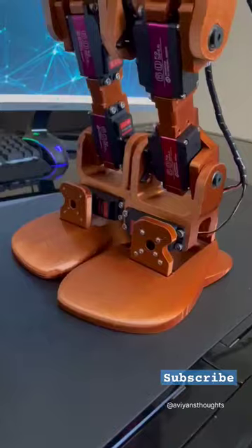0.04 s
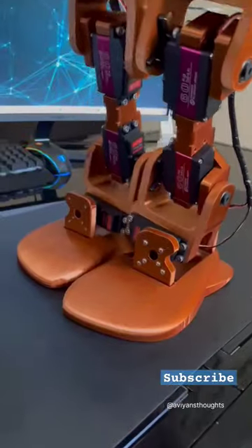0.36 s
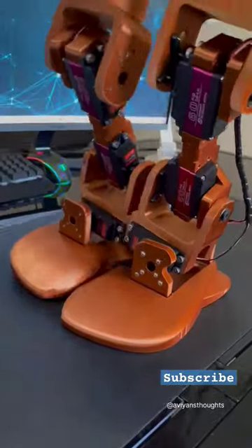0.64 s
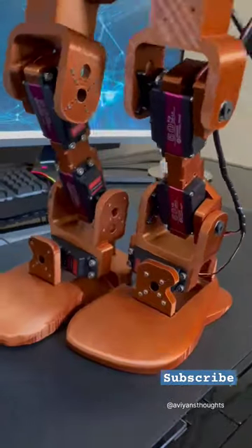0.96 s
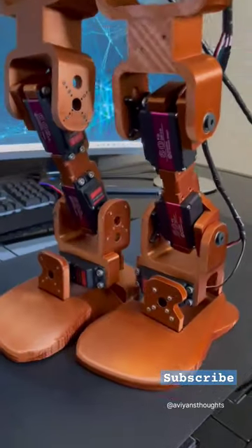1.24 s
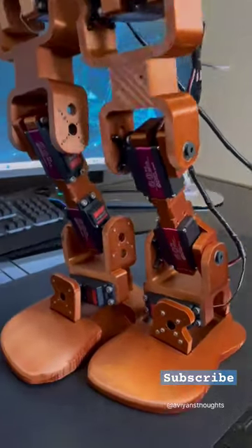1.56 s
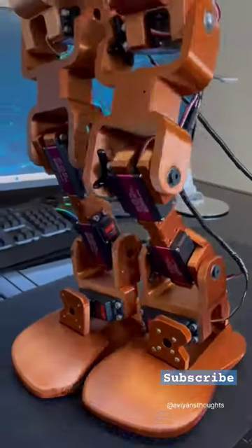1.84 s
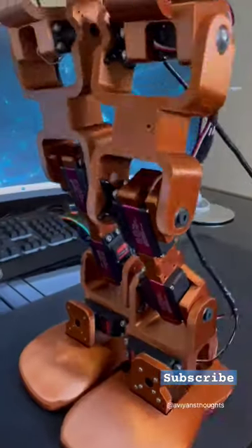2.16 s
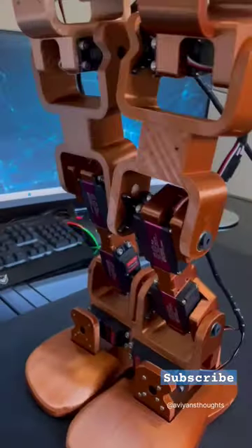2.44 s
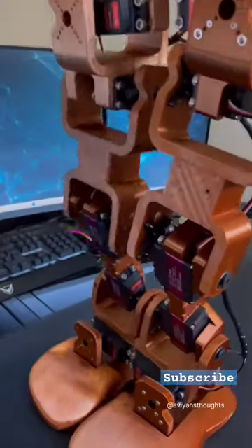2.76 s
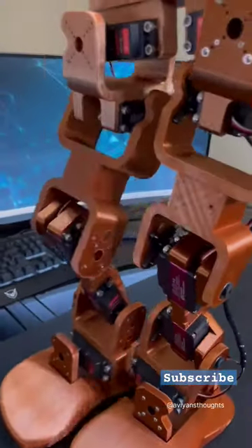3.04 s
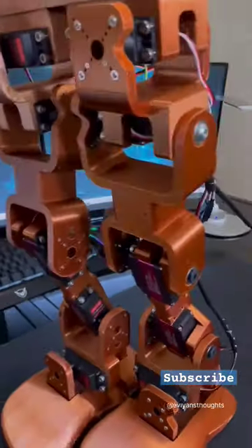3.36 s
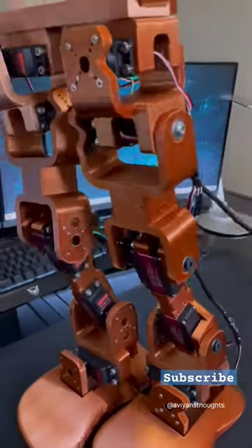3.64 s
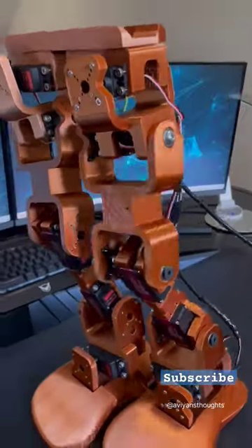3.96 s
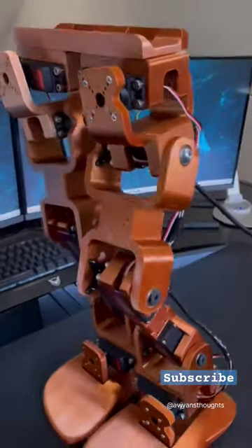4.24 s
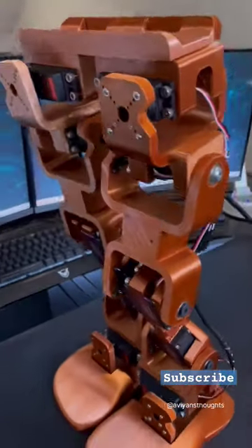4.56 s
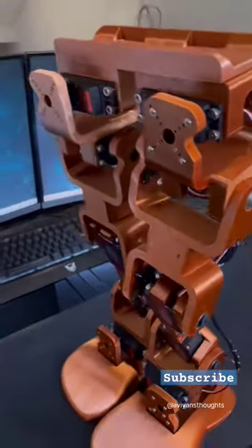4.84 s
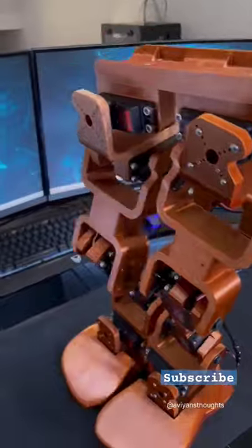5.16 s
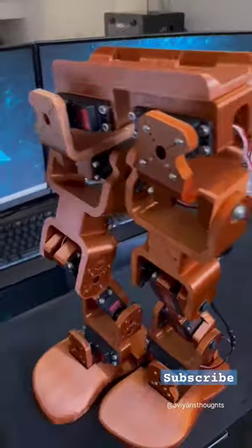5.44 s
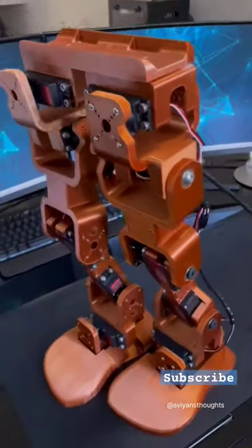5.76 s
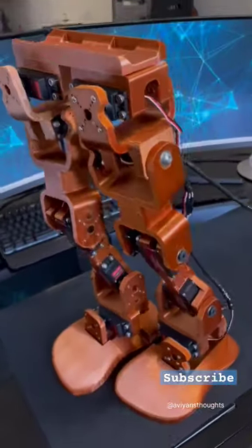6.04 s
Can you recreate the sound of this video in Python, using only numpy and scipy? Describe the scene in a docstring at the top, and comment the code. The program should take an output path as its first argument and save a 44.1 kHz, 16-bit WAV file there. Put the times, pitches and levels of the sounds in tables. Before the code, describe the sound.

A little walking robot's motors whine up and down close by, with squeaky gears and plastic feet knocking on a desk.

```python
"""Geared servos whirr up and down, close to the microphone: a small printed-plastic biped walks on a desk.
Five times a leg swings, gear teeth whining, rattling and squealing under load, slack joints ticking.
A hollow foot chatters down, the desk booms and the frame rocks; then the servos creep on to shift
the weight. Behind it are the short reflections and steady air of a small room. The microphone's two
ports hear the robot slightly out of step, while the boom sits in the middle."""
import sys
import numpy as np
from scipy import signal
from scipy.fft import rfft, irfft, next_fast_len
from scipy.io import wavfile
from scipy.ndimage import uniform_filter1d

SR = 44100
rng = np.random.default_rng(int(sys.argv[2]) if len(sys.argv) > 2 else 0)


def waveform_to_disk(signal):
    """Save audio, clipped to [-1, 1], as 16-bit WAV at the path in sys.argv[1]."""
    frames = np.transpose(np.atleast_2d(signal))
    scaled = np.clip(frames, -1, 1) * 32767
    samples = np.round(scaled).astype(np.int16)
    wavfile.write(sys.argv[1], SR, samples)


N = 269010
TIME = np.arange(N) / SR

# Leg swings. Each row: times of engaging and of top speed, then lengths of run-up and braking, in
# seconds; top tooth rates of hip and knee in Hz; whine, rattle, sizzle and frame lurch in dB.
SWINGS = [(0.443, 0.683, 0.15, 0.087, 1587, 1521, -39.5, -38, -48.5, -44),
          (1.572, 1.827, 0.12, 0.068, 1546, 1467, -44.5, -40, -52.5, -49.5),
          (2.73, 2.954, 0.15, 0.084, 1589, 1568, -39, -36.5, -49, -47.5),
          (3.802, 4.115, .185, 0.059, 1490, 1420, -48, -41.5, -53.5, -52.5),
          (5.014, 5.219, 0.16, 0.1, 1549, 1514, -39.5, -38.5, -50.5, -45)]
# Weight shifts onto the landed foot. Each row: start and length of the full push in seconds,
# tooth rate in Hz, then whine, rattle and sizzle in dB.
SHIFTS = [(0.988, 0.062, 1732, -46.5, -41.5, -56.5), (2.135, 0.055, 1721, -54, -44.5, -59.5),
          (3.258, 0.1, 1703, -53.5, -42, -58.5), (4.345, .14, 1720, -59.5, -47, -61.5),
          (5.542, 0.064, 1780, -50.5, -42.5, -56.5)]
# Small balancing moves. Each row: start and length in seconds, first and last tooth rate in Hz,
# then whine, rattle and sizzle in dB.
TRIMS = [(0.802, 0.14, 1570, 1520, -63, -56, -78), (1.201, 0.048, 1313, 1077, -64, -49.5, -50),
         (1.238, 0.29, 1698, 1747, -60, -54, -64), (1.974, 0.089, 1510, 1390, -62.5, -49, -50),
         (3.483, 0.33, 1638, 1422, -61.5, -52.5, -52.5), (3.568, 0.21, 1225, 1019, -61.5, -49, -53),
         (4.245, 0.1, 1225, 1017, -53.5, -54, -50.5), (5.325, 0.085, 1555, 1707, -61, -50, -71),
         (5.702, 0.14, 1554, 1657, -59.5, -47, -49.5), (5.865, 0.22, 1720, 1663, -61, -54.5, -66.5)]
# A slack joint snaps over, then slides. Each row: time in seconds, tick in dB, slide sizzle in dB.
TICKS = [(0.443, -49, -61), (0.53, -38, -52), (.7154, -42, -51), (0.9265, -37, -50), (2.821, -44, -53),
         (3.207, -35, -52), (4.69, -46, -55.5), (4.995, -48, -70), (5.0685, -42, -62), (5.096, -45, -43.5)]
# A sole chatters until the weight comes down. Each row: start and chatter length in seconds, chatter
# in dB, lead of the foot's main mode in dB per octave, pitch factor of the foot, thump and hardness
# in dB, rocking length in seconds, rocking in dB.
FOOTFALLS = [(0.92, 0.0051, -45, 1.5, 1, -44, 14, 0.077, -38),
             (1.884, 0.021, -26.5, 10.5, 1.01, -42.5, 15.5, 0.052, -40),
             (2.066, 0.024, -34, 3.5, 0.99, -38.5, 8, .04, -45),
             (2.12, 0.029, -41.5, 0, 1.02, -37, 7, .05, -41),
             (3.19, 0.0062, -42.5, 3, 1.01, -49, 13.5, 0.093, -41),
             (4.167, 0.0092, -25, 14, 1.06, -52.5, 18.5, 0.068, -41.5),
             (4.319, 0.024, -40, 3.5, 1.05, -48.5, 14, .04, -46),
             (4.379, 0.015, -48.5, 0, 1, -43, 10.5, .05, -42),
             (4.405, 0.015, -44, 2.5, 1, -53, 5, 0.045, -46.5),
             (5.45, 0.015, -51.5, 1.5, 1, -41.5, -13, 0.046, -45.5),
             (5.532, 0.0073, -59, 6, 1, -43.5, -5, 0.078, -48)]
# Spectrum of the gears under a slow push. Each row: frequency in Hz, relative level in dB.
SHIFT_COLOUR = [(400, -5.5), (1100, -5.5), (1700, 3), (2100, -6.5), (2800, -2.5), (3500, 1), (4400, -3),
                (5300, -1.5), (6200, -7), (7000, -2.5), (8300, -14)]

SLOW_END_LOSS = .3  # share of top speed lost at either end of a swing
PUSH_RISE_DB_PER_S, PUSH_FALL_DB_PER_S, TRIM_SAG_DB_PER_S = 85, 90, 20.5


def servos():
    """Joints whine at slightly different speeds; partials light up as they cross the case resonances."""
    # Partials in a swing and in a slow move; the quarters come from the uneven pinion.
    # Each row: multiple of the tooth rate, relative level in dB.
    swing_orders = [(1, -10), (1.25, -11), (1.75, -13), (2, 3), (2.25, -10), (2.5, -5), (2.75, -12), (3, 8),
                    (3.25, -5), (3.5, -8), (3.75, -12), (4, 5.5), (4.5, -8), (5, -9)]
    shift_orders = [(1, -16), (1.5, -7), (1.75, -5), (2, 2), (2.25, -3), (2.5, -5), (3, 2.5), (3.25, 2),
                    (3.5, 2), (3.75, -5)]
    # Servo case resonances. Each row: frequency in Hz, width in Hz, gain in dB.
    case_modes = [(1490, 510, -1.5), (2883, 260, -1.5), (3158, 120, 4.5), (3560, 410, -2.5),
                  (4545, 173, 1.5), (5400, 620, -6), (6067, 240, 1), (8040, 610, 2.5)]
    # The frame hums while a motor creeps on under the weight.
    # Each row: start and length in seconds, first and last pitch in Hz, level in dB.
    hums = [(1.0, .45, 1660, 1690, -55), (3.263, 0.48, 1664, 1475, -61), (5.532, 0.364, 1693, 1684, -54)]
    # A limb sings along with a swinging motor's lowest partial.
    # Each row: peak time in seconds, level in dB, half length in seconds.
    sings = [(.618, -41, 0.011), (.65, -39.5, 0.006), (.7, -44, 0.016), (.735, -43.5, 0.0064),
             (1.82, -48, 0.031), (2.872, -44, 0.012), (2.995, -46.5, 0.024), (4.12, -52, 0.043),
             (5.148, -43.5, 0.012), (5.295, -48.5, 0.008)]
    hip_moves, knee_moves = swing_moves("hip", lead_s=0), swing_moves("knee", lead_s=.015)
    slow_moves = shift_moves() + trim_moves()
    creeps = [[(s, first_hz, db), (s + length, last_hz, db)] for s, length, first_hz, last_hz, db in hums]
    hip = whine(hip_moves, swing_orders, hunt=.007, jitter=.009, rough=.15, scatter_hz=20, fade_s=.012)
    knee = whine(knee_moves, swing_orders, hunt=.014, jitter=.011, rough=.5, scatter_hz=24, fade_s=.025)
    loaded = dict(jitter=.006, rough=.7, scatter_hz=9)
    lean = whine(slow_moves, shift_orders, speed=.99, hunt=.018, fade_s=.03, **loaded)
    ankle = whine(slow_moves, shift_orders, speed=.935, hunt=.024, fade_s=.04, **loaded)
    lowest = [(1, 0)]  # this partial also leaks straight through the limbs
    leak = whine(trim_moves(), lowest, speed=.98, hunt=.03, jitter=.022, rough=.6,
                 scatter_hz=60, fade_s=.03)
    hum = whine(creeps, lowest, hunt=.014, jitter=.022, rough=.85,
                scatter_hz=75, fade_s=.067, chatter_db=1)
    limb = whine(hip_moves, lowest, speed=.992, hunt=.01, jitter=.012, rough=.2,
                 scatter_hz=80, fade_s=.02, chatter_db=1)
    cases = resonate(hip + from_db(-3) * knee + lean + ankle, case_modes)
    return cases + from_db(1.5) * leak + hum + swells(sings) * evened(limb, window_s=.0094)


def whine(moves, orders, hunt, jitter, rough, scatter_hz, fade_s, speed=1, chatter_db=2):
    """A gear mesh sings as its speed hunts; uneven bite scatters a share of each partial into a band."""
    out = np.zeros(N)
    for move in moves:
        s, tooth_hz, level_db = np.transpose(move)
        span = slice(int((s[0] - fade_s) * SR), min(int((s[-1] + fade_s) * SR), N))
        t = TIME[span]
        size = len(t)
        path_hz = np.interp(t, s, tooth_hz)
        slowness = ((1 - path_hz / path_hz.max()) / SLOW_END_LOSS) ** 2
        wander = 1 + hunt * drift(18.08, size) + jitter * drift(265, size)
        turns = np.cumsum(path_hz * speed * wander) / SR
        fade = np.clip(np.minimum(t - t[0], t[-1] - t) / fade_s, 0, 1)
        gain = fade * from_db(np.interp(t, s, level_db) + chatter_db * drift(140, size))
        for order, db in orders:
            scatter = drift(scatter_hz * order, size) + 1j * drift(scatter_hz * order, size)
            bite = np.sqrt(1 - rough) + np.sqrt(rough / 2) * scatter
            mesh = np.real(bite * np.exp(2j * np.pi * (order * turns + rng.random())))
            dulling_db = 12 * max(order - 2, 0) * slowness
            out[span] += gain * from_db(db - dulling_db) * mesh
    return out


def swing_moves(joint, lead_s):
    """A swing eases up to top speed and brakes ever harder; points of seconds, tooth Hz and whine dB."""
    moves = []
    for _, fastest, run_up, braking, hip_hz, knee_hz, db, *_ in SWINGS:
        top_hz = hip_hz if joint == "hip" else knee_hz
        fastest = fastest - lead_s
        t = TIME[int((fastest - run_up) * SR):int((fastest + braking) * SR)]
        early = np.maximum(fastest - t, 0) / run_up
        late = np.maximum(t - fastest, 0) / braking
        speed = 1 - SLOW_END_LOSS * (early ** 1.9 + late ** 4.2)
        level_db = db - 18.5 * early ** 1.94 - 6 * late ** 29  # the whine sinks at both slow ends
        moves.append(np.column_stack([t, top_hz * speed, level_db]))
    return moves


def shift_moves(lead_s=.07, trail_s=.133, slowing=.1):
    """In a weight shift the motor's speed and level follow its push."""
    moves = []
    for s, length, hz, db, *_ in SHIFTS:
        t = np.array([s - lead_s, s, s + length, s + length + trail_s])
        push_db = held(s, length, PUSH_RISE_DB_PER_S, PUSH_FALL_DB_PER_S, t)
        speed = 1 - slowing * (1 - from_db(push_db))
        moves.append(np.column_stack([t, hz * speed, db + push_db]))
    return moves


def trim_moves(spin_s=.035):
    """In a balancing move the tooth rate glides while the level sags."""
    return [[(s - spin_s, first_hz, db), (s + length + spin_s, last_hz, db - TRIM_SAG_DB_PER_S * length)]
            for s, length, first_hz, last_hz, db, *_ in TRIMS]


def gear_rattle():
    """Loose teeth knock, brighter in a swing; loaded gears ring faintly throughout; brushes sizzle."""
    # Spectra of the swing's rattle and of the brushes. Each row: frequency in Hz, relative level in dB.
    swing_colour = [(400, -5.5), (1000, -5), (1550, 4.5), (2150, -6), (2800, 10), (3500, 10), (4200, 8.5),
                    (5400, 11), (6200, 9), (7000, -1.5), (8300, -11.5)]
    sizzle_colour = [(4000, -42), (6500, 9.5), (8000, -2), (10000, -23), (12300, 22.5), (14000, -38),
                     (16000, -39)]
    # Ringing gears. Each row: frequency in Hz, width in Hz, relative level in dB.
    gear_modes = [(3280, 57, -2), (3400, 28, -3.5), (3720, 44, -1), (3655, 40, -1.5)]
    fast_gain, slow_gain, sizzle_gain = gear_levels()
    bite = from_db(1.94 * drift(49) - .5)
    knocks = coloured(grains(per_s=2500, spread_db=3.5, smooth=.58), swing_colour)
    fast = from_db(.16) * fast_gain * bite * limb_resonances(knocks, width_hz=12, db=-.5)
    slow = bite * slow_rattle(slow_gain)
    ringing = from_db(-66) * evened(resonate(rng.standard_normal(N), gear_modes), window_s=.047)
    grit = grains(per_s=1200, spread_db=1.8, smooth=.7)
    flicker = from_db(1.4 * drift(69) + 2.4 * drift(40))
    sizzle = sizzle_gain * flicker * coloured(grit, sizzle_colour)
    return fast + slow + ringing + sizzle


def gear_levels():
    """Gains of the fast rattle, the slow rattle and the sizzle: all moving joints add in power."""
    fast, slow, sizzle = 0, from_db(-63.5) ** 2, from_db(-79.5) ** 2  # servos holding still
    for engage, fastest, *_, rattle_db, sizzle_db, _ in SWINGS:
        fast += swing_effort(engage, fastest, rattle_db, swell_db=18.5, fall_db_per_s=121) ** 2
        sizzle += swing_effort(engage, fastest, sizzle_db, swell_db=16, fall_db_per_s=236) ** 2
    pushes = [held(s, length, PUSH_RISE_DB_PER_S, PUSH_FALL_DB_PER_S) for s, length, *_ in SHIFTS]
    trims = [held(s, length, rise_db_per_s=454, fall_db_per_s=233) + held(s, 0, 0, TRIM_SAG_DB_PER_S)
             for s, length, *_ in TRIMS]
    for effort_db, (*_, rattle_db, sizzle_db) in zip(pushes + trims, [*SHIFTS, *TRIMS]):
        slow += from_db(rattle_db + effort_db) ** 2
        sizzle += from_db(sizzle_db + effort_db) ** 2
    for s, _, slide_db in TICKS:
        sizzle += from_db(slide_db + held(s, 0, rise_db_per_s=2500, fall_db_per_s=195)) ** 2
    return np.sqrt(fast), np.sqrt(slow), np.sqrt(sizzle)


def swing_effort(engage, fastest, top_db, swell_db, fall_db_per_s, engage_s=.01, coast_s=.05):
    """Gain that jumps up as the motor engages, swells to top speed, coasts and dies away."""
    engaged = np.clip((TIME - engage) / engage_s, 0, 1)
    ahead = np.clip((fastest - TIME) / (fastest - engage), 0, 1)
    return engaged * from_db(top_db + held(fastest, coast_s, 0, fall_db_per_s) - swell_db * ahead ** 2)


def slow_rattle(gain, treble_hz=4400, full_push_db=-50):
    """Under a slow push the teeth knock and chirp in equal shares; the treble grows with the effort."""
    knocks = coloured(grains(per_s=700, spread_db=2, smooth=.45), SHIFT_COLOUR)
    rattle = np.sqrt(.5) * (limb_resonances(knocks, width_hz=40, db=5) + tooth_chirps())
    low = filtered(filtered(rattle, treble_hz, "low"), treble_hz, "low")
    high = filtered(filtered(rattle, treble_hz, "high"), treble_hz, "high")
    return gain * (low + high * (gain / from_db(full_push_db)) ** .44)


def tooth_chirps(per_s=300, half_s=.011, low_hz=2600, high_hz=6600, glide_hz_per_s=3500):
    """Loaded teeth give a steady crowd of brief wavering tones; unit power."""
    s = np.arange(.1, TIME[-1] - .05, 1 / per_s)
    offset, pitch, slope = rng.uniform(-1, 1, (len(s), 3)).T
    hz = np.interp(pitch, [-1, 1], [low_hz, high_hz])
    chirps = np.column_stack([s + offset / per_s, at_hz(SHIFT_COLOUR, hz), np.full(len(s), half_s),
                              hz, glide_hz_per_s * slope])
    return evened(stick_slip(chirps, waver=.004, rough_db=2), window_s=.06)


def limb_resonances(x, width_hz, db):
    """The printed limbs add many narrow, irregularly spaced resonances; unit power."""
    pitches = np.geomspace(2300, 7200, 40) * rng.uniform(.985, 1.015, 40)
    return rms_one(x + resonate(x, [(hz, width_hz, db) for hz in pitches]))


def friction():
    """Gear trains squeal under load, and dry joints squeak as they break loose."""
    # Each row: peak time in seconds, level in dB, half length in seconds, pitch in Hz, glide in Hz/s.
    gear_squeals = [(.505, -47.5, 0.021, 3000, 2000), (.555, -41.5, 0.0075, 3020, 0),
                    (.58, -42, 0.0084, 6300, 0), (.615, -47, .022, 3550, 0), (.672, -38, 0.0063, 2970, 0),
                    (.675, -45, .009, 3990, 0), (.749, -35, 0.006, 5250, -4000),
                    (.749, -47, .006, 2620, -20000), (1.615, -47, 0.0077, 3400, 0),
                    (1.668, -39.5, 0.0099, 3360, 2994), (1.72, -35, 0.013, 3350, 0),
                    (1.752, -38, 0.02, 3800, 0), (1.875, -35.5, 0.012, 4210, -8000),
                    (1.893, -35.5, .008, 3700, 6), (2.185, -41.5, 0.021, 3444, -2),
                    (2.77, -47, 0.012, 3300, -4), (2.812, -46, 0.013, 3150, 0),
                    (2.85, -40.5, 0.0072, 2650, 0), (2.85, -47, .008, 5500, 0), (3.395, -38, .014, 3550, 0),
                    (3.39, -42.5, .014, 3150, 0), (3.01, -36, .011, 4350, -14000),
                    (3.025, -37.5, 0.0063, 2620, -14000), (3.27, -56, .014, 5850, 3000),
                    (3.322, -44, .006, 3880, 0), (3.705, -58, 0.016, 1130, 1498),
                    (3.985, -44, .01, 3480, 1000), (4.02, -44, 0.0075, 3890, 2000),
                    (4.075, -47, 0.023, 5740, 8005), (4.135, -43, 0.015, 5890, -6000),
                    (5.095, -40.5, 0.013, 3200, -2), (5.14, -39.5, 0.011, 2570, 4000),
                    (5.575, -52, 0.017, 5230, 3000), (5.585, -43, .018, 6220, 1500),
                    (5.66, -43, .01, 3470, 0), (5.66, -42, .01, 3040, 0), (5.77, -46, 0.017, 3620, 0)]
    joint_squeaks = [(.533, -54, 0.0039, 10000, 0), (.547, -40, 0.0048, 12100, 5000),
                     (5.078, -44, .008, 10100, -8000), (5.102, -45.5, 0.0072, 10100, 0)]
    squealing = stick_slip(gear_squeals, waver=.022, rough_db=3)
    return squealing + stick_slip(joint_squeaks, waver=.015, rough_db=3)


def stick_slip(rows, waver, rough_db):
    """Rubbing surfaces give short tones that swell, glide and waver."""
    out = np.zeros(N)
    for s, db, half, hz, glide in rows:
        span = slice(int((s - 4 * half) * SR), int((s + 4 * half) * SR))
        t = TIME[span] - s
        turns = np.cumsum(hz * (1 + waver * drift(300, len(t))) + glide * t) / SR
        grip = rms_one(from_db(rough_db * drift(160, len(t))))
        swell = from_db(db) * np.exp(-(t / half) ** 2 / 2)
        out[span] += swell * grip * np.sqrt(2) * np.sin(2 * np.pi * turns)
    return out


def backlash(decay_s=.01, rise_s=.0012):
    """Slack joints slip over with a short bright tick."""
    # Spectrum of a tick. Each row: frequency in Hz, relative level in dB.
    tick_colour = [(1500, 10), (3500, 20), (6500, 16), (10000, 13.5), (12500, 7), (15500, -13)]
    envelope = np.zeros(N)
    for s, db, _ in TICKS:
        at = round((s - rise_s) * SR)
        age = TIME[:N - at]
        envelope[at:] += from_db(db) * np.exp(-np.minimum(age / decay_s, 50)) * np.minimum(age / rise_s, 1)
    return envelope * coloured(rng.standard_normal((2, N)), tick_colour)


def soles(touch_s=.0027, main_hz=1270, fade_db_per_s=250):
    """A landing sole chatters in a quick run of weakening touches that ring the hollow foot."""
    # Modes of the plastic foot. Each row: frequency in Hz, level in dB, seconds to fall by 60 dB.
    foot_modes = [(340, -2, 0.18), (532, -4.5, 0.1), (704, -6.5, 0.062), (816, -2.5, 0.035),
                  (990, -13, 0.031), (1209, -3.5, 0.059), (1374, -12, 0.087), (1710, -3, 0.015),
                  (2410, 5.5, 0.0039), (3630, -6, 0.045)]
    out = np.zeros(N)
    for s, length, level_db, focus_db, pitch, *_ in FOOTFALLS:
        at = int(s * SR)
        delays = np.append(0, np.cumsum(rng.uniform(.5, 1.8, 20))) * touch_s
        strengths = (delays <= length) * from_db(-fade_db_per_s * delays)
        for hz, db, t60 in foot_modes:
            force = np.zeros(SR // 4)
            force[(delays * SR).astype(int)] = rng.normal(1, .94, 21) * strengths
            # the sole gives, so each mode takes a moment to build
            tone = resonate(ring(force, pitch * hz, t60), [(pitch * hz, .74 * hz, 0)])
            peak = from_db(level_db + db - focus_db * abs(np.log2(hz / main_hz)))
            out[at:at + len(tone)] += peak * tone / np.max(np.abs(tone))
    return out


def desk(hard_hz=147):
    """Footfalls and the rocking frame drive the same low modes; harder landings reach the higher ones."""
    # Modes of desk and frame. Each row: frequency in Hz, level in dB, seconds to fall by 60 dB.
    desk_modes = [(55.6, -6.5, 0.8), (71.3, -5.5, 0.4), (119, -3.5, 0.23), (135.2, -2.5, 0.3),
                  (182.2, -7.5, 0.18), (231.9, -9.5, 0.18), (276.3, -13, 0.14), (345.2, -10, 0.072),
                  (426.5, -14.5, 0.091)]
    s, chatter, _, _, _, thump_db, hardness_db, _, _ = np.transpose(FOOTFALLS)
    landings = ((s + chatter) * SR).astype(int)
    thumps, rumble = np.zeros(N), np.zeros(N)
    for hz, db, t60 in desk_modes:
        blows = np.zeros(N)
        lift_db = np.clip(np.log2(hz / hard_hz), 0, 1) * hardness_db
        blows[landings] = from_db(thump_db + db + lift_db) * rng.choice([-1, 1], len(s))
        thumps += ring(blows, hz, t60)
        rumble += from_db(db) * ring(rng.standard_normal(N), hz, t60)
    boom = thumps + rocking() * evened(rumble, window_s=.072) + shudder()
    return filtered(boom, 56, "high")


def rocking(lurch_s=.0048, idle_db=-74.5):
    """Gain of the frame's rocking: it lurches when a leg brakes and rocks on after every footfall."""
    lurches = [db + held(fastest + braking - lurch_s / 2, lurch_s, rise_db_per_s=108, fall_db_per_s=147)
               for _, fastest, _, braking, *_, db in SWINGS]
    landings = [db + held(s + chatter, length, rise_db_per_s=1500, fall_db_per_s=74.5)
                for s, chatter, *_, length, db in FOOTFALLS]
    return np.sqrt(sum(from_db(db) ** 2 for db in [idle_db, *lurches, *landings]))


def shudder(hz=137.7):
    """A loaded leg shudders on its sole with a low, wavering tone."""
    # Each row: peak time in seconds, level in dB.
    shudders = [(1.936, -33.5), (1.995, -45), (2.16, -28), (2.23, -43)]
    gain = sum(from_db(db + held(s, 0, rise_db_per_s=319, fall_db_per_s=186)) for s, db in shudders)
    turns = np.cumsum(hz * (1 + .036 * drift(11.8))) / SR
    return gain * np.sin(2 * np.pi * turns)


def room(x, t60_s=.27):
    """Nearby walls and screens reflect the sound, ten feedback delays a side; the bass stays direct."""
    out = np.zeros((2, N))
    x = filtered(x, 280, "high")
    for k, lag in enumerate((rng.uniform(.004, .035, 20) * SR).astype(int)):
        loop, gain = x.copy(), from_db(-60 * lag / SR / t60_s)
        for i in range(lag, N, lag):
            loop[i:i + lag] += gain * loop[i - lag:i][:N - i]
        out[k % 2] += (loop - x) * (-1) ** (k // 2)
    return out / np.sqrt(10)


def room_air():
    """Steady room tone: a low rumble under a faint hiss."""
    # Each row: frequency in Hz, relative level in dB.
    air_colour = [(25, -6), (60, 5), (130, -3.5), (250, -11.5), (500, -17), (1000, -14), (1600, -12.5),
                  (2200, -11.5), (3400, -11.5), (4500, -27), (8000, -25), (13000, -36), (15000, -56)]
    return from_db(-59.5) * coloured(rng.standard_normal((2, N)), air_colour)


def microphone(x):
    """The two microphone ports hear the same sound out of step."""
    # Each row: frequency in Hz, lead of the left port in radians.
    port_phase = [(200, 0), (700, .3), (1400, 0), (2300, .3), (3150, 2.0), (3900, .7), (4400, 1.2),
                  (4750, 2.9), (5100, 5.7), (6000, 6.8), (7000, 7.5), (9100, 8), (10000, 7.3), (13000, 7.3)]
    size = next_fast_len(N + SR // 10)
    hz = np.maximum(np.arange(size // 2 + 1) * SR / size, 1)
    phase = at_hz(port_phase, hz) * np.array([[.5], [-.5]])
    return irfft(rfft(x, size) * np.exp(1j * phase), size)[:, :N]


def grains(per_s, spread_db, smooth):
    """Two unrelated streams of tiny impacts of uneven size over smooth friction noise."""
    born = rng.random((2, N)) < per_s / SR
    noise = rng.standard_normal((2, N))
    sizes = from_db(spread_db * np.minimum(rng.exponential(1, N), 4))
    return rms_one(born * sizes * np.sign(noise)) + smooth * noise


def coloured(streams, colour):
    """Third-octave bands, taken from the two streams in turn; unit power."""
    out, edges = np.zeros(N), 25 * 2 ** (np.arange(29) / 3)
    for k, (low, high) in enumerate(zip(edges, edges[1:])):
        if high > colour[0][0] and low < colour[-1][0]:
            band = filtered(streams[k % 2], [low, high], "band")
            out += band * from_db(at_hz(colour, np.sqrt(low * high)))
    return rms_one(out)


def ring(force, hz, t60):
    """One mode: a unit click starts a sine of height 1."""
    r, w = from_db(-60 / (t60 * SR)), 2 * np.pi * hz / SR
    return signal.lfilter([0, np.sin(w)], [1, -2 * r * np.cos(w), r * r], force + 1e-18)


def resonate(x, resonances):
    """Parallel resonances with alternating signs."""
    out = 0
    for k, (hz, width, db) in enumerate(resonances):
        r = np.exp(-np.pi * width / SR)
        band = signal.lfilter([1, 0, -1], [1, -2 * r * np.cos(2 * np.pi * hz / SR), r * r], x + 1e-18)
        out += (-1) ** k * from_db(db) * (1 - r * r) / 2 * band
    return out


def filtered(x, hz, kind):
    """A gentle low-, high- or band-pass."""
    return signal.sosfilt(signal.butter(2, hz, kind, fs=SR, output="sos"), x)


def drift(rate_hz, size=N):
    """A smooth random wander with spread 1."""
    r = np.exp(-40 * np.pi * rate_hz / SR)
    slow = signal.lfilter([1], [1, -2 * r, r * r], rng.standard_normal(size // 20 + 1002))[1000:]
    return np.interp(np.arange(size) / 20, np.arange(len(slow)), rms_one(slow))


def held(start, length, rise_db_per_s, fall_db_per_s, t=TIME):
    """Attack, hold and release, in dB relative to the top."""
    before, after = np.maximum(start - t, 0), np.maximum(t - start - length, 0)
    return -np.minimum(rise_db_per_s * before + fall_db_per_s * after, 200)


def swells(rows):
    """A bell-shaped rise and fall for each row."""
    return sum(from_db(db) * np.exp(-np.minimum(((TIME - s) / half) ** 2, 50) / 2) for s, db, half in rows)


def at_hz(points, hz):
    """Read a curve on a log-frequency axis."""
    f, value = np.transpose(points)
    return np.interp(np.log(hz), np.log(f), value)


def evened(x, window_s):
    """Unit power over every short stretch."""
    return x / np.sqrt(np.abs(uniform_filter1d(x * x, int(window_s * SR))) + 1e-12)


def rms_one(x):
    """Scale to unit power."""
    return x / np.sqrt(np.mean(x ** 2) + 1e-20)


def from_db(db):
    """Decibels to gain."""
    return 10 ** (np.asarray(db) / 20)


def scene():
    """The robot close up, the desk's boom in the middle, the small room around them."""
    robot = friction() + servos() + gear_rattle() + backlash() + soles()
    near = robot + room_air()
    boom = desk()
    reflections = from_db(-5.5) * room(near + from_db(-7) * boom)
    balance = from_db([[-1.1], [-.2]])
    return (microphone(near) + reflections) * balance + boom


def record(dry):
    """The sound opens after a moment of silence; the top is cut."""
    start_s, fade_s, cutoff_hz = .2448, .0025, 15600
    opened = np.clip((TIME - start_s) / fade_s, 0, 1)
    return signal.sosfilt(signal.ellip(10, .2, 80, cutoff_hz, fs=SR, output="sos"), dry * opened)


dry = scene()
out = record(dry)
waveform_to_disk(out)
```